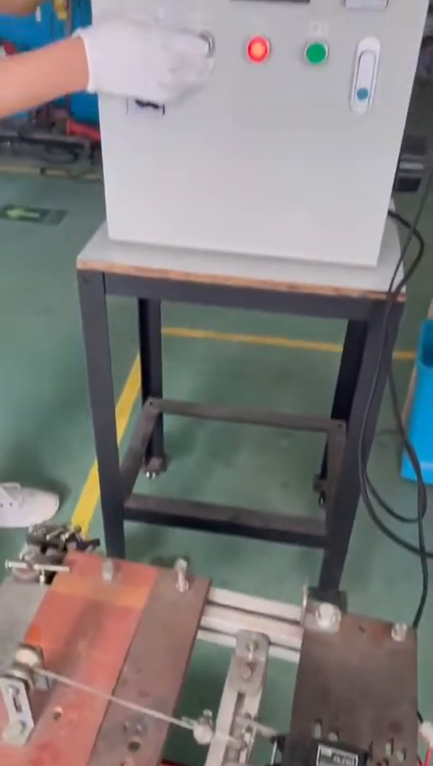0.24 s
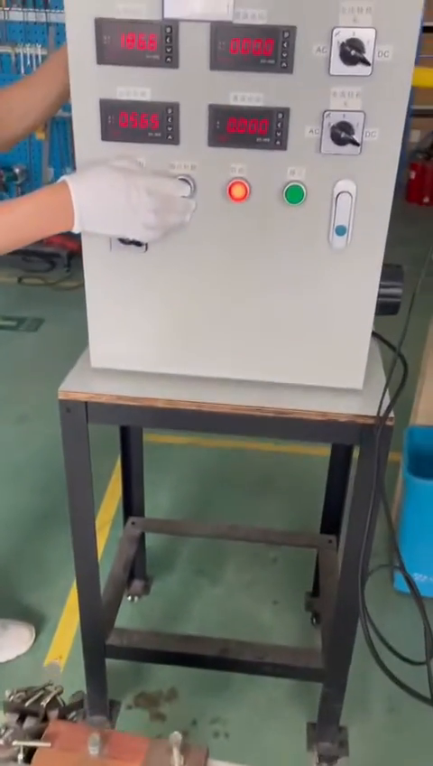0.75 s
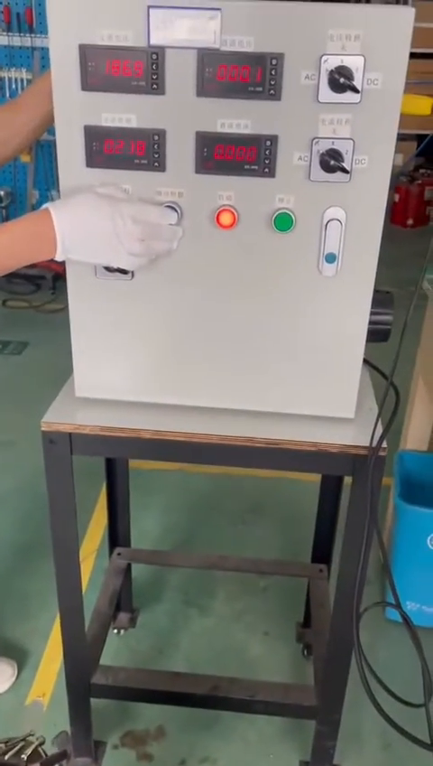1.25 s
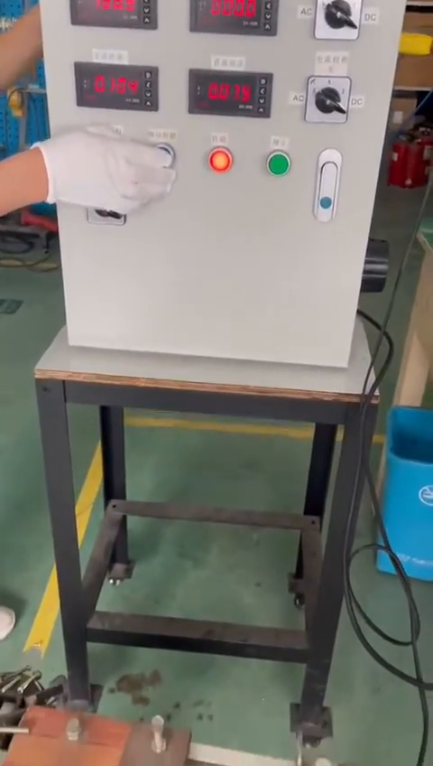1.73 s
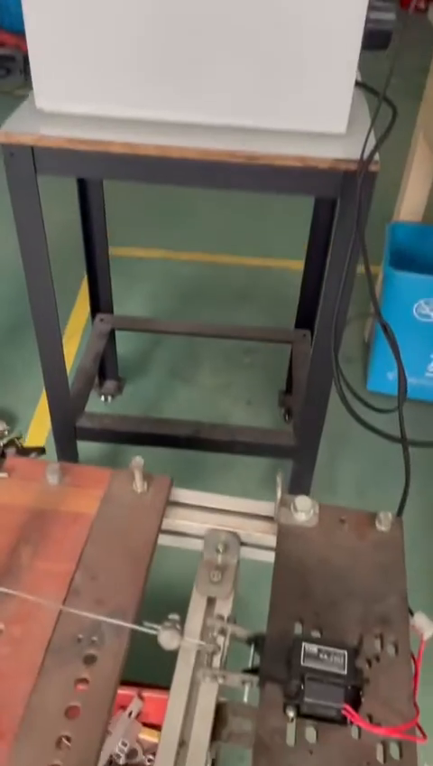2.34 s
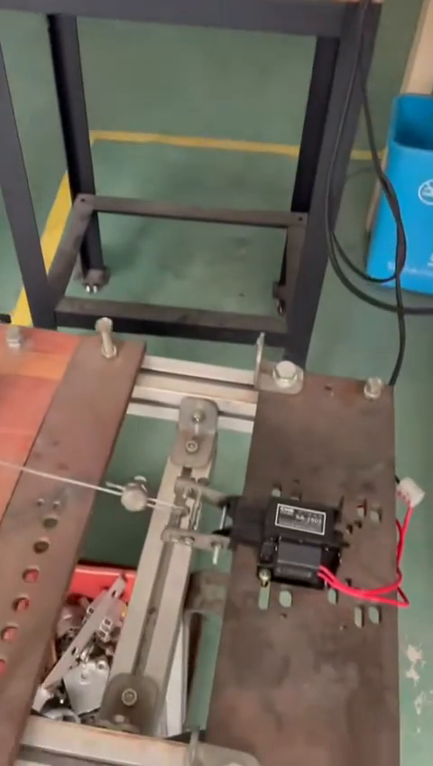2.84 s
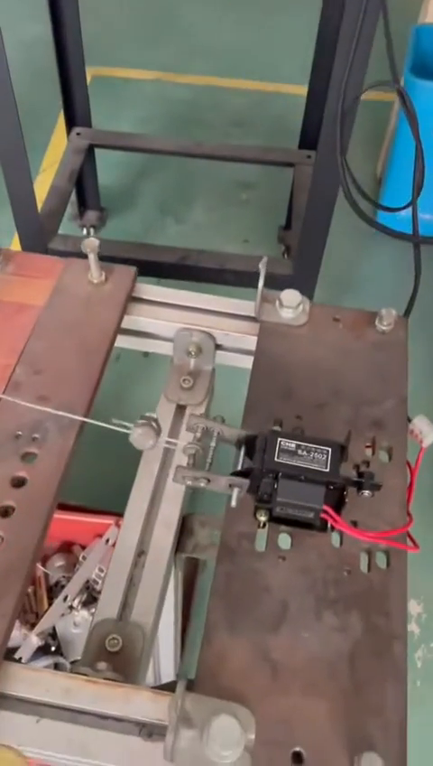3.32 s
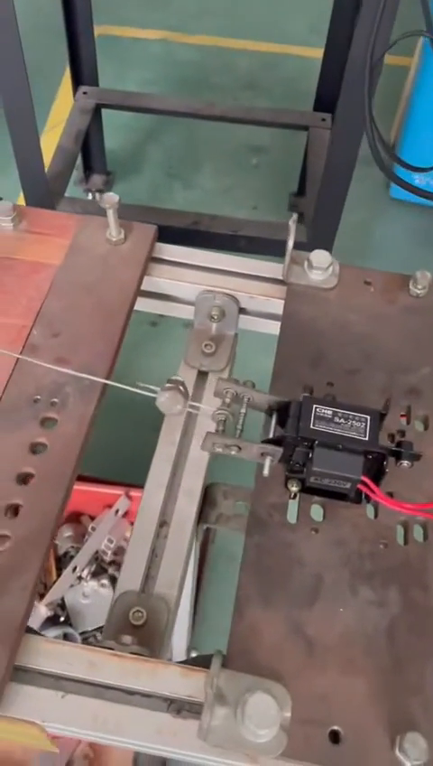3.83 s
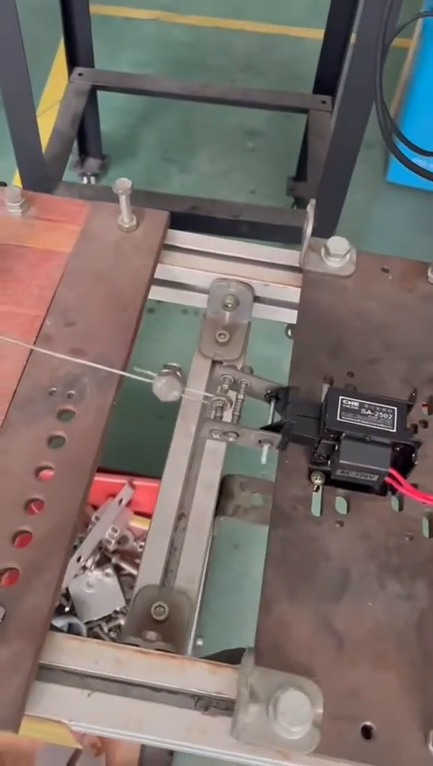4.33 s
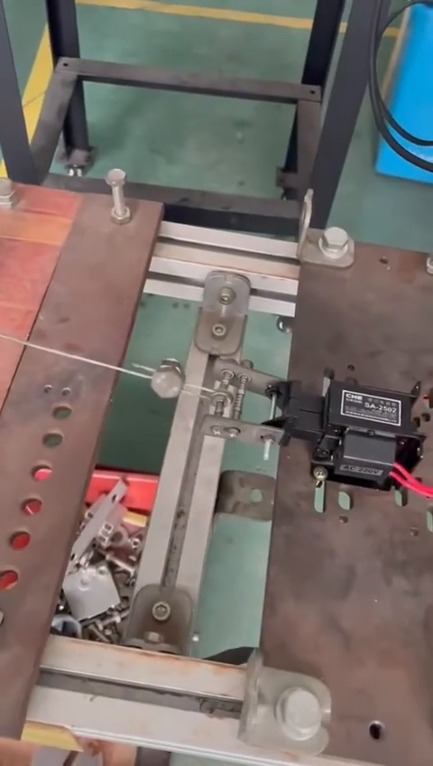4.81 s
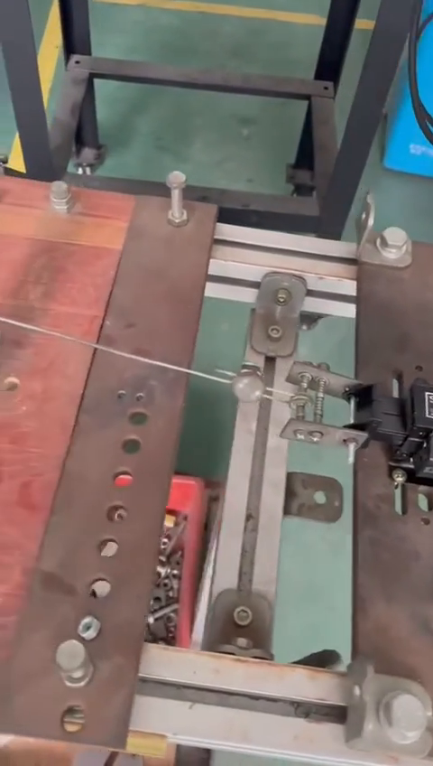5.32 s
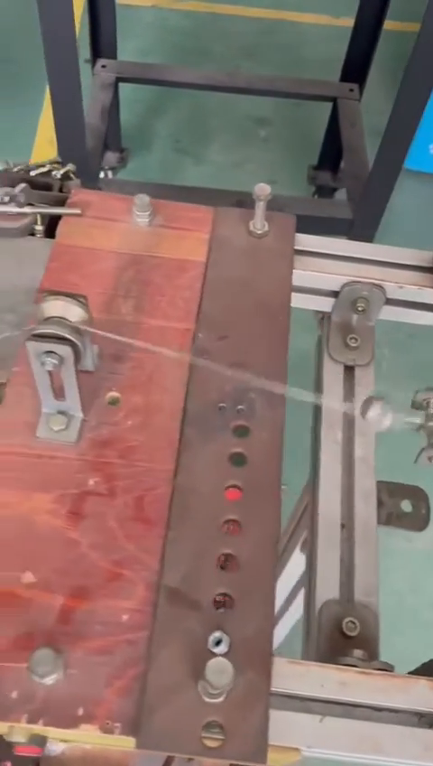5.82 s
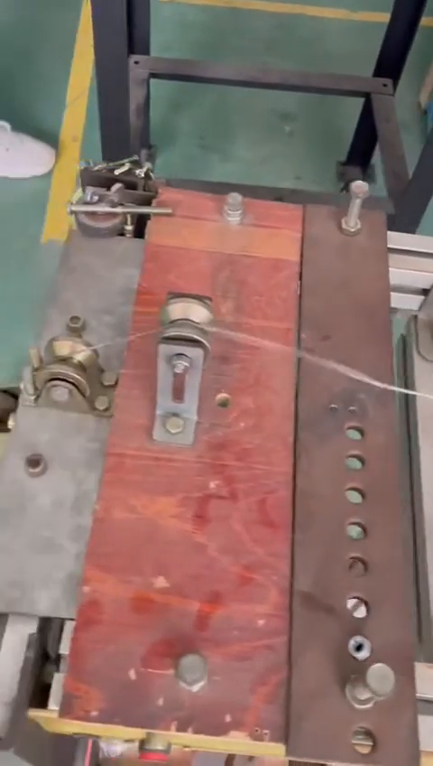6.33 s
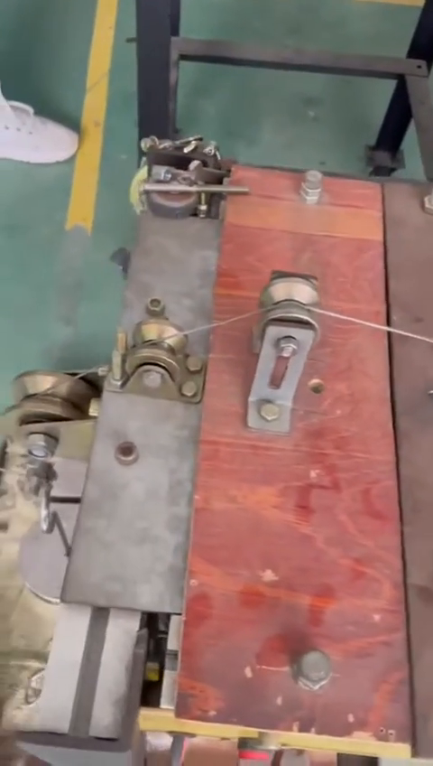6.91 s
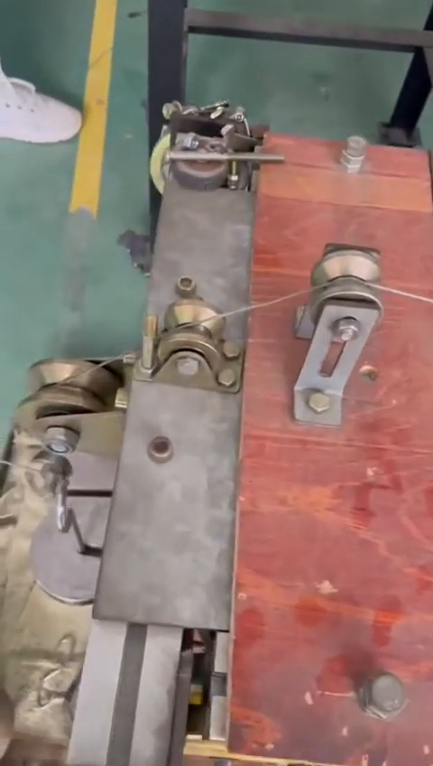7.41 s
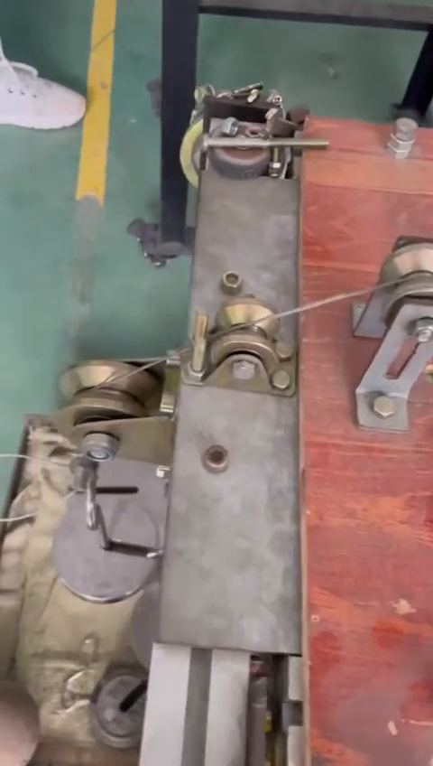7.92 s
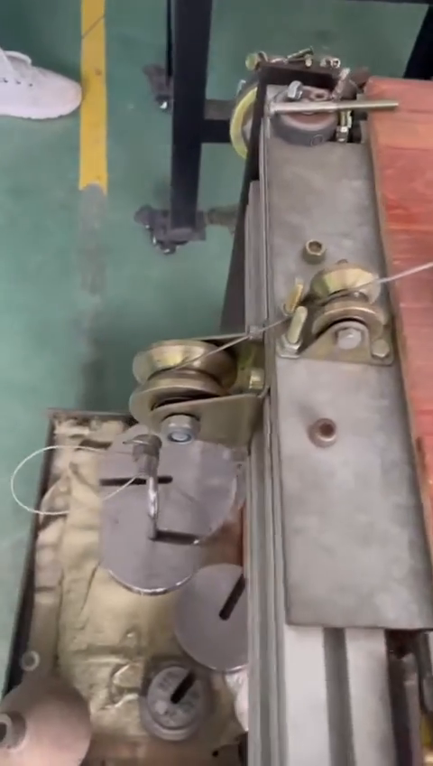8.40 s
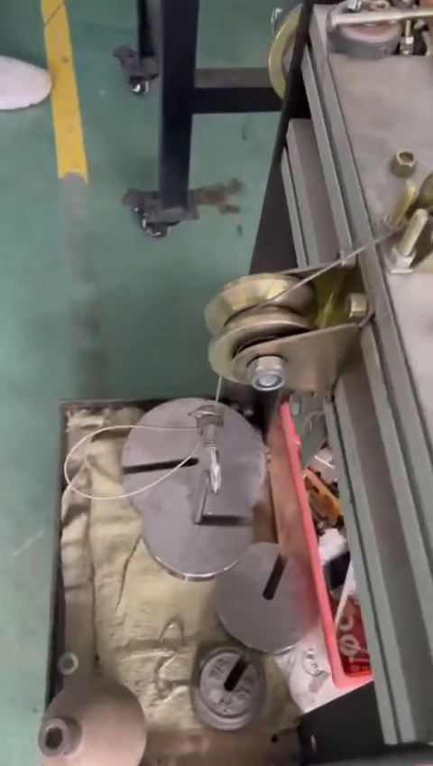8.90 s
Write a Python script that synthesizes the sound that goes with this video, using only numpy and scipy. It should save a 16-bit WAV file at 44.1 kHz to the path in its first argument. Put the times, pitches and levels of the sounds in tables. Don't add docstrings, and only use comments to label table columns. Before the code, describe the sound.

A solenoid on a steel test rig buzzes, scrapes and slams hard, then releases with a softer ticking slide, four times in a large factory hall.

```python
import sys
import numpy as np
from scipy import signal
from scipy.fft import rfft, irfft
from scipy.io import wavfile
from scipy.ndimage import uniform_filter1d

SR = 44100
rng = np.random.default_rng(int(sys.argv[2]) if len(sys.argv) > 2 else 0)


def unload_audio(sound):
    columns = np.transpose(np.atleast_2d(sound))
    steps = np.round(np.clip(columns, -1, 1) * 32767)
    wavfile.write(sys.argv[1], SR, steps.astype(np.int16))


def makeup_ratio(level_db):
    decades = np.asarray(level_db, float) / 20
    return 10 ** decades


N = 403515


def colour(x, points, tilt_db=0.):
    hz, db = np.transpose(points)
    octave = np.log2(np.maximum(np.arange(len(x) // 2 + 1) * SR / len(x), 1))
    gain_db = np.interp(octave, np.log2(hz), db) + tilt_db * octave
    y = irfft(rfft(x) * makeup_ratio(gain_db), len(x))
    return y / np.sqrt(np.mean(y ** 2))


def band(x, lo_hz, hi_hz):
    y = signal.sosfilt(signal.butter(2, [lo_hz, hi_hz], "bandpass", fs=SR, output="sos"), x)
    return y / np.sqrt(np.mean(y ** 2))


def walk(rate_hz):
    hold = int(SR / rate_hz)
    levels = np.repeat(rng.standard_normal(N // hold + 1), hold)
    return 1.19 * uniform_filter1d(levels, hold)[:N]


def ring(push, modes, shorten):
    t = np.arange(SR // 2) / SR
    answer = np.zeros(len(t))
    for hz, db, t60_s in modes:
        answer += makeup_ratio(db - 60 * t / (shorten * t60_s)) * np.sin(2 * np.pi * hz * t)
    return signal.fftconvolve(push, answer)[:N] * walk(90)


def strokes(rows, rise_s, sag_at, settle_s, settle_db, follow=1., offset_db=0.):
    gain, t = np.zeros(N), np.arange(N) / SR
    for grip_s, travel_s, db, sag_db, stop_db in rows:
        times = grip_s + np.array([-rise_s, 0, sag_at * travel_s, travel_s, travel_s + settle_s])
        shape_db = np.interp(t, times, [-24, 0, sag_db, stop_db, stop_db + settle_db])
        fade = np.clip(np.minimum(t - times[0], times[-1] - t) / .004, 0, 1)
        gain += fade * makeup_ratio(db + offset_db + follow * shape_db)
    return gain


# freq_hz, level_db, t60_s
CORE = [(968, 0.5, 0.033), (712, -0.5, 0.035), (389, -2, 0.054), (1505, -17, .025), (2150, -8, 0.0218),
        (3400, -22, 0.012), (5110, -8.5, .02)]
# freq_hz, density_db_per_hz
EDGE = [(1180, -67), (2000, -10.5), (2170, -10), (2390, -7.5), (3360, -6.5), (3790, -8.5), (5160, -10),
        (6520, -15), (7600, -36), (8520, -24), (10500, -20), (12900, -22), (13800, -64)]


def slide(stroke, scrape, buzz, grit_db, core_db, edge_db, shudder_db, follow):
    mains_hz = 50
    phase = (2 * mains_hz * (np.arange(N) / SR + .0015)) % 1
    jolt = 1 - buzz + 2.5 * buzz * np.exp(-phase / 0.11)
    grit = np.tanh(np.array([walk(200), walk(400)]))
    slips = rng.standard_normal((2, N)) * makeup_ratio(grit_db * grit)

    hum = buzz * np.sin(2 * np.pi * phase)
    shudder = hum + (.7 - 0.14 * buzz) * band(rng.standard_normal(N), 74, 191)
    core = band(ring(slips[1] * jolt ** 2, CORE, 1), 300, 6500)
    body = colour(slips[0] * np.sqrt(jolt), scrape) + makeup_ratio(core_db) * core

    cycles = np.repeat(rng.standard_normal(N // 441 + 2), 441)[66:N + 66]
    bite = 1 - buzz + 2.0 * buzz * makeup_ratio(3.6 * cycles) * np.exp(-phase / .1)
    edge = colour(slips[1] * bite, EDGE)
    out = 0.84 * body * strokes(*stroke)
    out += 0.78 * edge * strokes(*stroke, follow, edge_db)
    return out + shudder * strokes(*stroke, follow, shudder_db)


# grip_s, travel_s, level_db, sag_db, stop_db
PULL = [
    (.282, 0.1, -23.5, -5, -4),
    (2.904, 0.089, -25, -6, 1),
    (5.602, .098, -22.5, -1.5, 3),
    (7.775, .097, -22.5, 0.5, 2.5),
]
# freq_hz, density_db_per_hz
SCRAPE = [(120, -10), (200, -2), (285, -6.5), (362, 0), (531, -4.5), (689, -5), (992, -2.5), (1380, -7),
          (2190, -10.5), (2400, -19), (3120, -29), (5280, -120)]


def haul_in():
    stroke = dict(rise_s=0.011, sag_at=0.7, settle_s=0.026, settle_db=-.1)
    return slide((PULL, *stroke.values()), SCRAPE, buzz=0.43, grit_db=2.8, core_db=-3.3,
                 edge_db=-10.0, shudder_db=-0.67, follow=0.42)


# start_s, crack_db, crack_hz, weight_db
SLAMS = [(.3935, -1.5, 5780, -7), (.3985, -18, 4530, 0), (.4096, -12, 5220, -1), (2.9920, -15.5, 5500, -10),
         (3.0030, -18, 5500, -2), (3.0105, -3, 5670, -7.5), (3.0174, -23, 4930, 3),
         (5.6805, -14.5, 4680, -10), (5.7036, -9, 5400, 0), (5.7095, -2, 5560, -7),
         (5.7150, -9.5, 3030, 1.5), (5.7205, -10, 4930, -6), (5.7285, -22, 5400, -5),
         (7.872, -17, 4500, 4.5), (7.8795, -4, 4260, -15.5), (7.8842, -8, 4900, -3),
         (7.8906, -9.5, 5200, -9), (7.8973, -12.5, 4900, -5), (7.9061, -29, 5030, -4)]


def slams():
    return knocks(SLAMS, crack_s=0.0017, body_s=0.014, tail_s=0.013, tail_db=-9, tilt_db=0.2,
                  ring_db=-43, sizzle_db=-19, dulling=0.98)


# grip_s, travel_s, level_db, sag_db, stop_db
RELEASE = [
    (1.245, .082, -31.5, -4, 0.5),
    (3.95, 0.06, -29, -2, -2),
    (6.276, .062, -28.5, -6, -2),
    (8.488, 0.063, -30.5, -5.5, 2.5),
]
# freq_hz, density_db_per_hz
SLIP = [(120, -42), (200, -6.5), (351, -1), (687, -8), (747, -13), (1040, -9), (1810, -14.5), (2250, -15.5),
        (2750, -23.5), (3500, -24.5), (4550, -52), (7700, -120)]


def let_go():
    stroke = dict(rise_s=0.05, sag_at=0.72, settle_s=.1, settle_db=-19)
    return slide((RELEASE, *stroke.values()), SLIP, buzz=.02, grit_db=3.0, core_db=-7.0,
                 edge_db=-14.5, shudder_db=-5, follow=0.84)


# start_s, crack_db, weight_db
TICKS = [(1.1817, -49, -11), (1.2115, -38, -16), (1.2375, -30, 4), (1.2634, -44, -6), (1.3135, -28.5, -10),
         (1.3594, -43, -13), (1.3794, -41, -6), (2.8953, -22, -11), (3.9124, -44, -8), (3.936, -29, 5),
         (3.9588, -28, 4), (3.9933, -32, -1), (4.0094, -25.5, -6), (4.0554, -38, -8), (4.09, -36, 7),
         (5.5924, -32.5, -17), (6.2644, -37, -6), (6.2934, -39, -15.5), (6.339, -28, -14),
         (6.3827, -39, -16), (6.4293, -36.5, -6), (8.478, -30.5, -7), (8.497, -27, 2), (8.5385, -26.5, -2),
         (8.5504, -45, -19), (8.5924, -38.5, -23)]


def ticks():
    tick_hz = 4760
    events = [(s, db, tick_hz, weight_db) for s, db, weight_db in TICKS]
    return knocks(events, crack_s=0.0015, body_s=0.0047, tail_s=0.012, tail_db=-3, tilt_db=1.3,
                  ring_db=-37, sizzle_db=-14.0, dulling=1.19)


# start_s, crack_db, weight_db
RELAY = [
    (0.248, -44, -16),
    (1.2101, -38, -10),
    (2.8694, -41, -16),
    (3.913, -37, -4),
    (5.569, -44, -16),
    (6.2382, -42.5, -15.5),
    (7.742, -38, -9),
    (8.451, -39, -6),
]


def relay():
    relay_hz = 5500
    events = [(s, db, relay_hz, weight_db) for s, db, weight_db in RELAY]
    return knocks(events, crack_s=0.0032, body_s=0.0036, tail_s=0.027, tail_db=-1, tilt_db=4.9,
                  ring_db=-49.0, sizzle_db=-17, dulling=1.73)


# freq_hz, level_db, t60_s
FRAME = [(391, -9, 0.068), (708, -16, 0.72), (957, -12, 0.086), (1224, -3.5, 0.35), (1353, -9.5, 0.42),
         (1656, -21, 0.12), (1814, -29, 0.31), (2164, -9.5, 0.97), (2950, -14, 0.68), (3150, -27, 0.27),
         (3520, -13.5, 1.5), (3880, -8, 0.27), (4230, -1.5, 0.26), (5230, -19, 0.39)]


def knocks(events, crack_s, body_s, tail_s, tail_db, tilt_db, ring_db, sizzle_db, dulling):
    out, t = np.zeros(N + SR), np.arange(SR // 8) / SR
    grain = rng.standard_normal((len(events), 4, len(t)))
    for (s, db, hz, weight_db), noise in zip(events, grain):
        crack = band(noise[0], 0.884 * hz, 1.037 * hz) + 0.32 * band(noise[0], 2100, 7000)
        crack *= 1.46 * np.exp(-t / crack_s)
        thud = makeup_ratio(weight_db + 3.0) * band(noise[1], 260, 1720)
        thud *= np.exp(-t / body_s) * (1 - np.exp(-t / 0.0056))
        sizzle = makeup_ratio(sizzle_db - dulling * weight_db) * band(noise[2], 8500, 13500)
        sizzle *= np.exp(-t / (1.03 * crack_s))
        tail = makeup_ratio(tail_db) * colour(noise[3], EDGE, tilt_db) * np.exp(-t / tail_s)
        at = int(s * SR)
        out[at:at + len(t)] += makeup_ratio(db - 8.0) * (crack + thud + sizzle + tail)
    return out[:N] + makeup_ratio(ring_db) * ring(out[:N], FRAME, .3)


def jerks(rows, late_s, jerk_db):
    jerk_hz, rise_s, t60_s = 141, .008, .16
    return [(s + travel_s + late_s, db + jerk_db, jerk_hz, rise_s, t60_s) for s, travel_s, db, *_ in rows]


# start_s, level_db, freq_hz, rise_s, t60_s
PINGS = [(1.3134, -41, 13000, .001, .03), (4.010, -21, 12700, .0004, 0.025), (4.012, -58, 12900, .004, 0.1),
         (6.4293, -48, 13000, .001, .04), (7.884, -35, 13300, .002, .06),
         (8.550, -26.5, 12800, .0004, 0.019), (0.45, -34, 1400, .02, 0.26), (5.808, -35, 1222, .004, 0.2),
         (7.935, -26, 1240, 0.018, 0.21), (5.72, -25, 388, 0.0075, 0.36), (1.185, -32, 2300, 0.002, 0.052),
         (3.03, -35, 2912, .004, 0.13), (8.97, -47, 5050, 0.0088, 0.14), (.445, -33.5, 2260, .01, 0.29),
         (7.783, -35, 5150, .01, 0.35), (8.407, -17, 58, .01, 0.17), (5.1, -32, 59, 0.016, 0.12),
         (1.7, -36, 102, .01, .15)]


def pings():
    out, t = np.zeros(N + SR), np.arange(SR // 2) / SR
    for s, db, hz, rise_s, t60_s in PINGS + jerks(PULL, 0.0295, -1.5) + jerks(RELEASE, -0.0047, 5.7):
        at = int(s * SR)
        swell = 1 - np.exp(-t / rise_s)
        out[at:at + len(t)] += makeup_ratio(db - 60 * t / t60_s) * swell * np.sin(2 * np.pi * hz * t)
    return out[:N] * makeup_ratio(2 * walk(120))


def room_echo(rig):
    t60_s, level_db = 0.78, -17.5
    t = np.arange(SR) / SR
    echo = band(rng.standard_normal(SR), 130, 9600) * makeup_ratio(-60 * t / t60_s) * (1 - np.exp(-t / 0.0026))
    return makeup_ratio(level_db) * signal.fftconvolve(rig, echo / np.sqrt(np.sum(echo ** 2)))[:N]


# start_s, level_db, rise_s, t60_s, bright_share
BLASTS = [(-.03, -50.5, 0.022, 0.61, 1), (1.869, -32, 0.045, 1.1, 0.11), (2.42, -32.5, 0.051, 1.2, 0.2),
          (3.08, -32.5, 0.098, 1.1, 0.16), (3.54, -31, 0.065, 1.26, 0.21),
          (4.091, -32.5, 0.054, 1.33, 0.21), (4.55, -56.5, 0.028, 0.86, .6), (5.05, -57.5, 0.015, 0.27, 1),
          (6.54, -59, 0.018, 0.45, 1), (6.75, -48, 0.025, 0.46, 0.96), (7.1, -56, .04, 0.47, 1),
          (7.3, -59, 0.043, 0.72, 1), (8.05, -44, 0.11, 1.9, 0.48), (.47, -36.5, 0.038, 0.62, .3),
          (8.62, -46.5, .05, 10, 0.32), (8.96, -56, 0.04, 0.21, 0.7)]
# freq_hz, density_db_per_hz
BLAST = [(88, -42), (150, -13), (467, -5), (695, -12), (1020, -14), (4120, -24), (6250, -33.5), (7270, -43),
         (7700, -59), (8460, -55), (10000, -75), (12400, -95), (13800, -76)]
# freq_hz, density_db_per_hz
PUFF = [(1180, -32.5), (2000, -6.5), (5460, 0.5), (6840, -11.5), (7670, -38), (8110, -15), (8940, -12),
        (11300, -15), (13800, -35)]


def blasts():
    out, t = np.zeros(N), np.arange(N) / SR
    dull = colour(rng.standard_normal(N), BLAST)
    bright = colour(rng.standard_normal(N), PUFF, 1.5)
    for s, db, rise_s, t60_s, bright_share in BLASTS:
        age_s = np.maximum(t - s, 0)
        share = bright_share * np.exp(-age_s / 0.31)
        gain = makeup_ratio(db - 60 * age_s / t60_s) * (1 - np.exp(-age_s / rise_s))
        out += gain * ((1 - share) * dull + share * bright)
    return 1.6 * out * makeup_ratio(.6 * walk(25))


# freq_hz, density_db_per_hz
HALL = [(12, -56.5), (20, -41.5), (31, -13), (49, 1.5), (335, -18), (364, -19), (406, -23), (478, -18),
        (519, -22.5), (2910, -37.5), (5460, -43.5), (6980, -56.5), (7790, -69.5), (9440, -57), (13800, -71)]
# time_s, fans_db, whine_db
BEARING = [(0., -3, -57), (1.7, -1, -49), (2.2, -1, -45.5), (3.4, -.5, -37.5), (4.4, -1.5, -40),
           (5.4, -2.5, -39.5), (6.3, -1, -52), (7.6, -2.5, -46.5), (9.15, -3, -52)]
# time_s, level_db
LOAD = [(0., -40), (.15, -19.5), (.66, -38), (1., -27.5), (1.45, -43), (1.75, -36), (2.3, -47),
        (3.75, -29.5), (4.2, -51), (4.6, -41), (5.33, -20), (5.6, -32), (5.92, -17.5), (6.3, -41),
        (6.75, -44), (7.6, -35), (7.95, -27.5), (9.15, -31)]


def hall():
    hall_db, whine_hz = -35, 481
    t = np.arange(N) / SR
    time_s, fans_db, whine_db = np.transpose(BEARING)
    wash_db = hall_db + np.interp(t, time_s, fans_db) + 0.84 * walk(6)
    wash = colour(rng.standard_normal(N), HALL) * makeup_ratio(wash_db)
    load_db = np.interp(t, *np.transpose(LOAD)) - 11.0
    rumble = band(rng.standard_normal(N), 43.5, 59.7) * makeup_ratio(load_db)
    whine = np.sin(2 * np.pi * np.cumsum(whine_hz + 1.75 * walk(8)) / SR)
    whine *= makeup_ratio(np.interp(t, time_s, whine_db) - 6.5 + 2.5 * walk(10))
    return wash + rumble + whine


def scene():
    rig = haul_in() + slams() + let_go() + ticks() + relay()
    return (rig + pings() + room_echo(rig) + blasts() + hall())[None]


# freq_hz, dip_db
THRIFT = [(1000, -4.5), (2400, -2.8), (3100, -1.7), (4600, -1.6), (5200, -3), (6500, -3.5)]


def starve(x):
    padded = np.pad(x, (0, -len(x) % 2048 + 1536))
    f, _, z = signal.stft(padded, SR, nperseg=1024)
    power = (np.abs(z[:-1]) ** 2).reshape(128, 4, -1, 4).mean(axis=(1, 3))
    db = 10 * np.log10(power + 1e-20)
    dip_db = np.interp(f[:-1:4], *np.transpose(THRIFT), left=-99, right=-99)[:, None]
    around_db = uniform_filter1d(db, size=7, axis=0)
    keep = np.where(db - around_db < dip_db + .35, .02, 1.)
    gain = np.vstack([np.kron(keep, np.ones((4, 4))), np.ones(z.shape[1])])
    return signal.istft(z * gain, SR, nperseg=1024)[1][:N]


def top_cut(x):
    return signal.sosfilt(signal.butter(12, 13990, fs=SR, output="sos"), x)


def record(dry):
    low = signal.butter(3, 38, "highpass", fs=SR, output="sos")
    gap = signal.ellip(4, .5, 35, [7120, 8300], "bandstop", fs=SR, output="sos")
    top = signal.ellip(5, .5, 42, 13650, fs=SR, output="sos")
    soft = np.tanh(.7 * dry[0]) / .7
    heard = starve(signal.sosfilt(np.vstack([low, gap, top]), soft))
    return top_cut(heard[None])


dry = scene()
out = record(dry)
unload_audio(out)
```